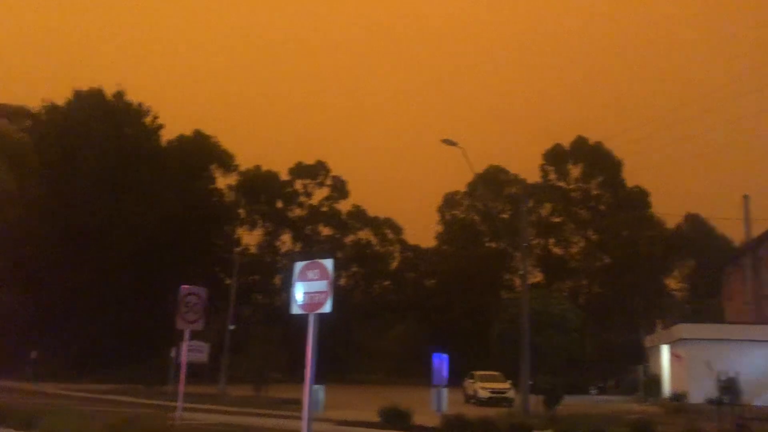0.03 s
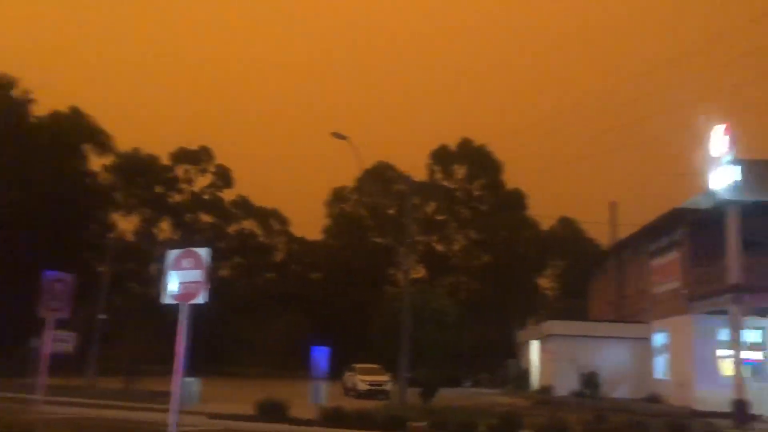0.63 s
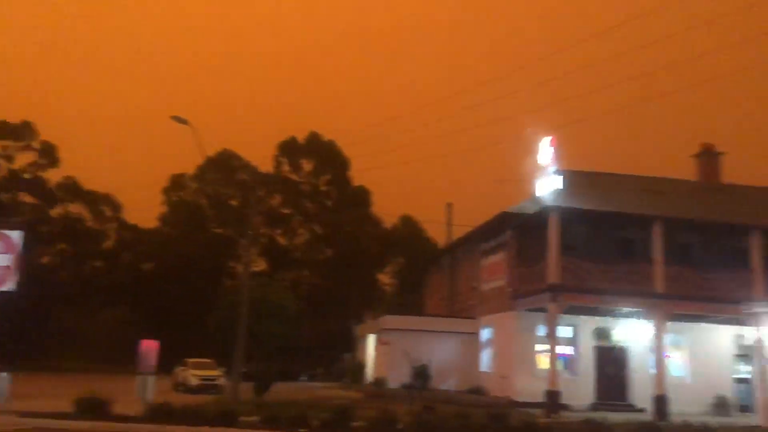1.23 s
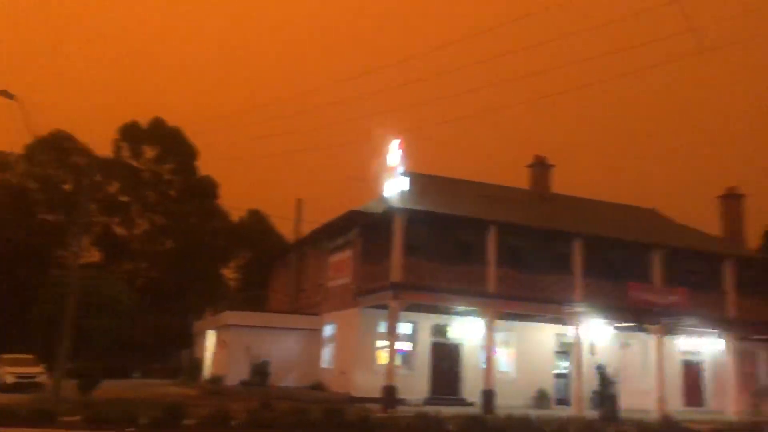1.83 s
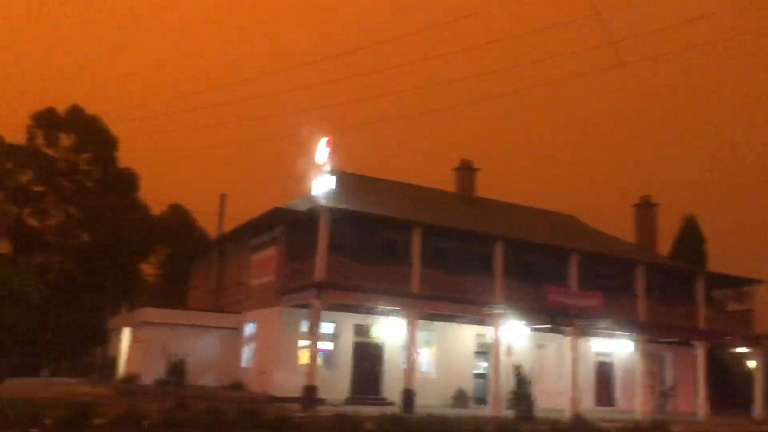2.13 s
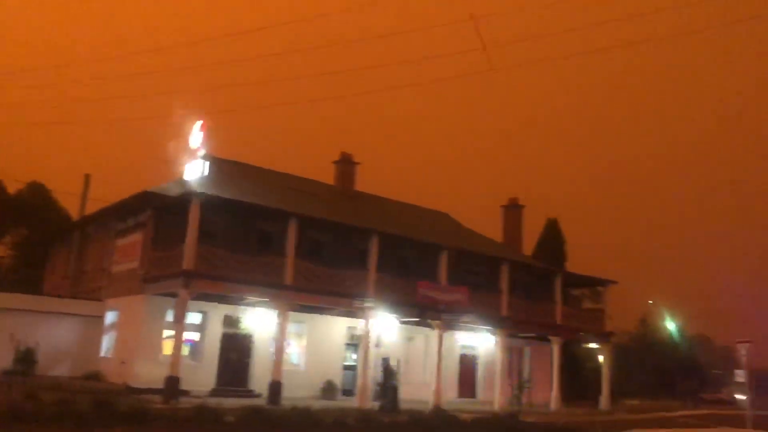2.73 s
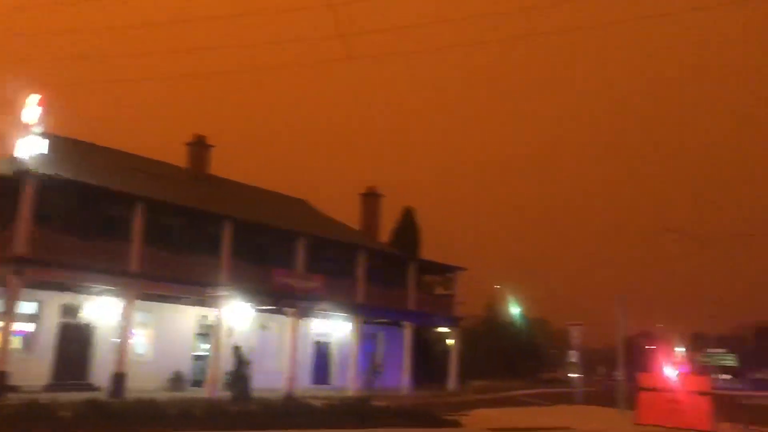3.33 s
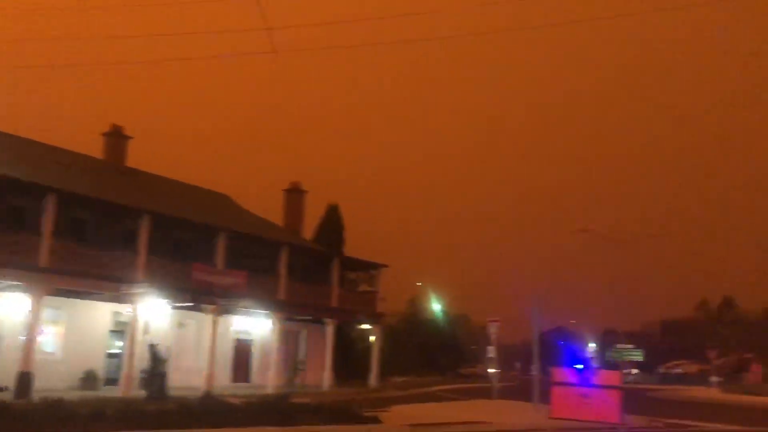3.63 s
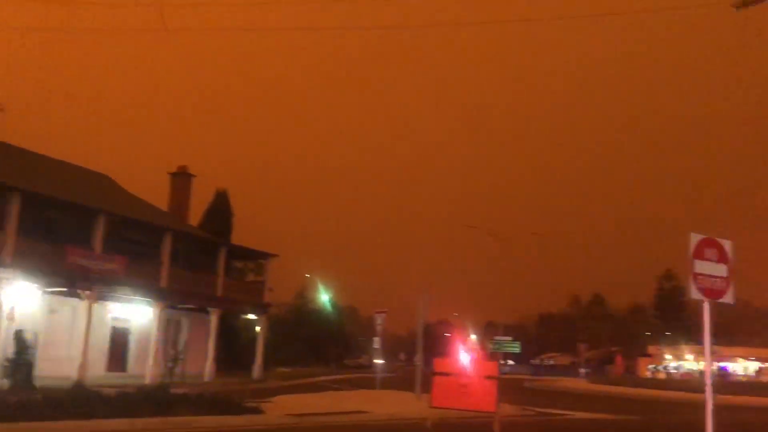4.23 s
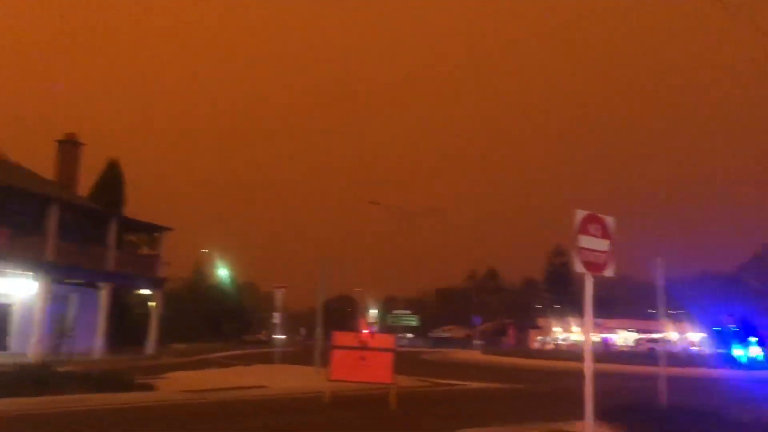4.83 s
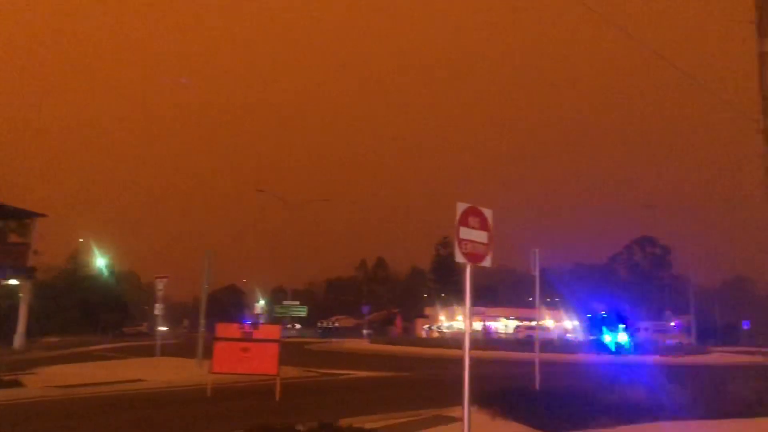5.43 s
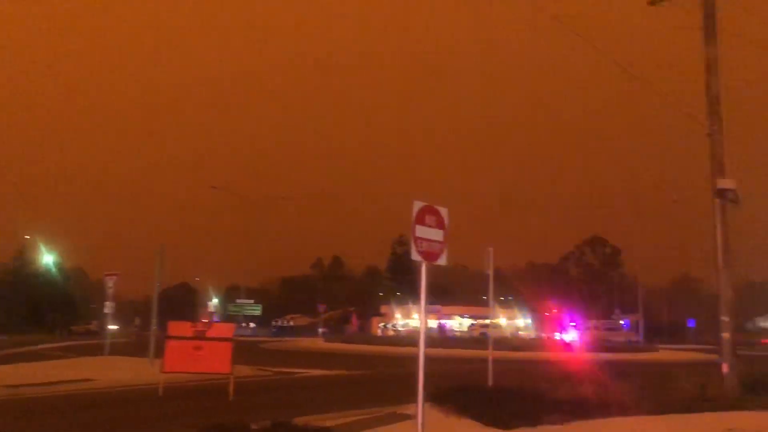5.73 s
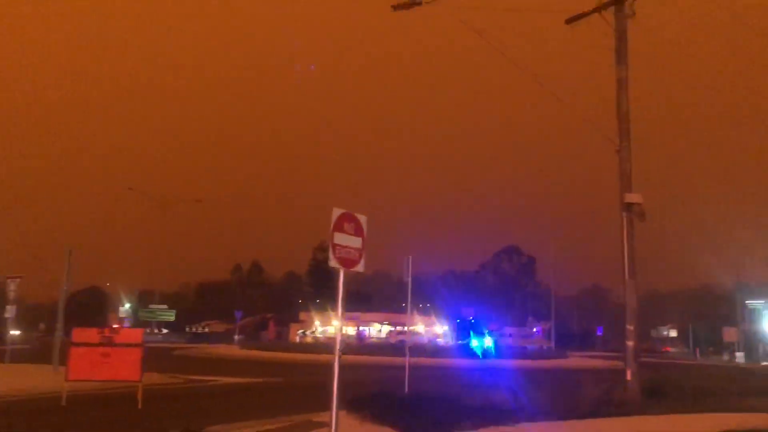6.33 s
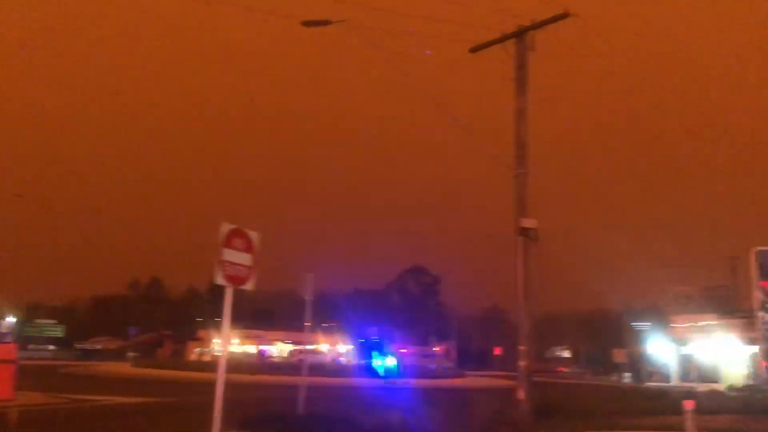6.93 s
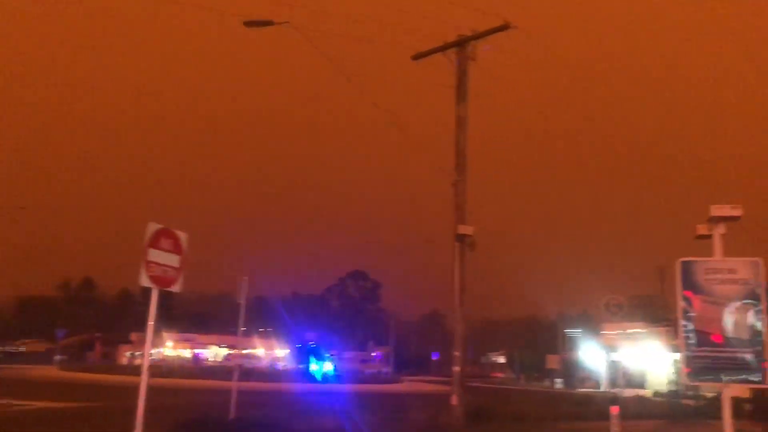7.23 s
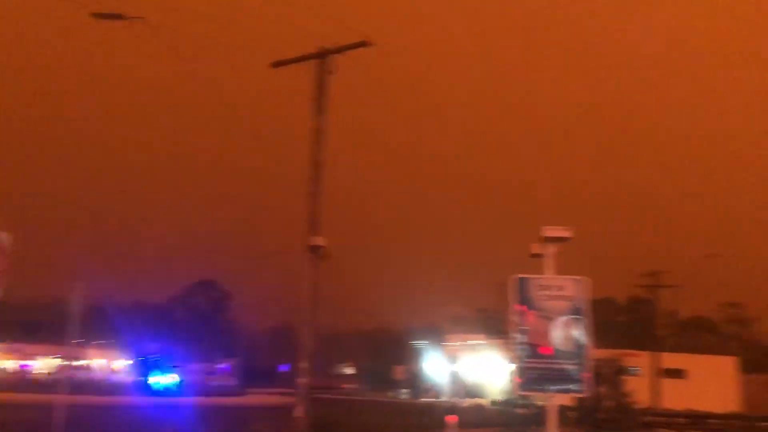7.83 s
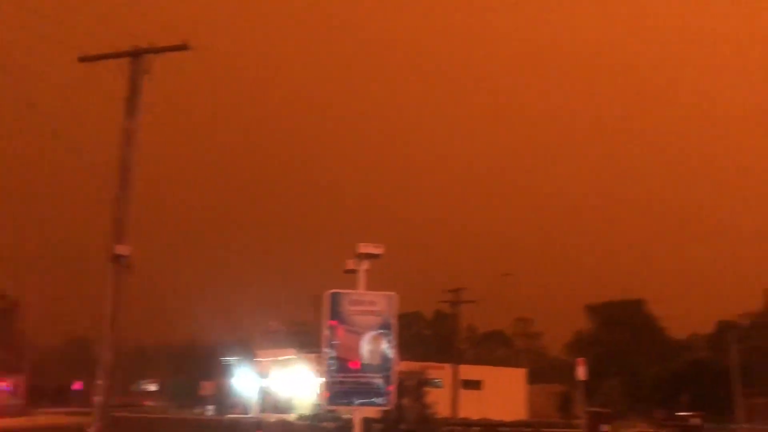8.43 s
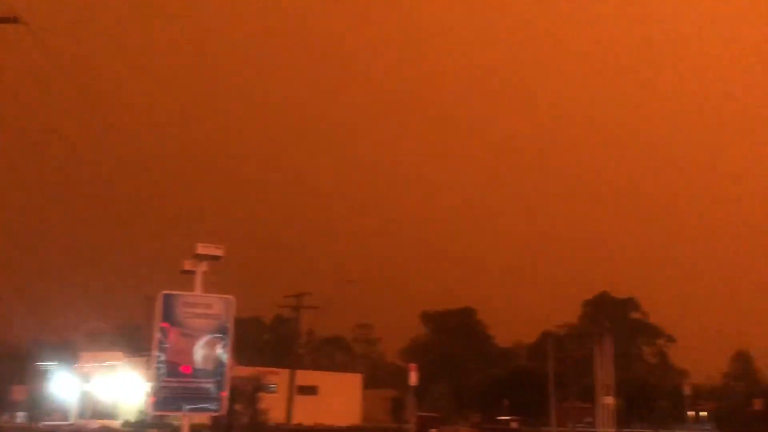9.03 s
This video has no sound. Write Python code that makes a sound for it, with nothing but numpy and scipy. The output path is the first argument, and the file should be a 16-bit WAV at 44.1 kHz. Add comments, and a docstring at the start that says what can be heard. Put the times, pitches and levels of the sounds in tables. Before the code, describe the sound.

A steady rumble of idling vehicles and far traffic outdoors, with gusts of wind and scattered handling clicks and bumps.

```python
"""Idling engines at a night junction

Two engines idle some way off, heard on a hand-held phone that slowly pans. Exhaust pulses drone and
injectors tick over a wash of fans and far traffic; tyre hiss grows at the end. Gusts buffet the
microphone, fingers rub, click and bump on the case, and the lens ticks as it focuses."""
import sys
import numpy as np
from scipy import signal
from scipy.fft import rfft, irfft
from scipy.io import wavfile
from scipy.ndimage import uniform_filter1d

SR = 44100
rng = np.random.default_rng(int(sys.argv[2]) if len(sys.argv) > 2 else 0)


def log_audio(samples):
    """Write samples as a 16-bit WAV file to the path given in sys.argv[1]."""
    # one column per channel
    frames = np.atleast_2d(samples).T
    # limit to full scale, then quantise
    limited = np.clip(frames, -1, 1)
    pcm = np.round(limited * 32767).astype(np.int16)
    wavfile.write(sys.argv[1], SR, pcm)


N = 399987
T = np.arange(N) / SR
FREQ_HZ = np.maximum(np.fft.rfftfreq(N, 1 / SR), 1)


# near exhaust harmonics: firing_multiple, level_db
NEAR_EXHAUST = [(1, -48.5), (2, -38), (3, -50), (4, -47.5), (5, -50.5), (6, -58), (7, -57.5), (8, -61),
                (11, -66.5), (18, -64)]
# near exhaust as the phone turns: time_s, gain_db
PAN_GAIN = [(0, -1.5), (4.1, 1), (4.7, -2), (6.5, -0.5), (7.3, 1), (9.07, .5)]
# far exhaust harmonics: firing_multiple, level_db
FAR_HARMONICS = [(3, -50.5), (4, -52), (6, -62.5), (8, -49), (12, -62)]

def engines(near_firing_hz=39.83, far_firing_hz=22.22):
    """Two governed idles, each hunting slightly about its speed."""
    near_cycles = np.cumsum(near_firing_hz * (1 + 0.00244 * walk(3))) / SR
    far_cycles = np.cumsum(far_firing_hz * (1 + 0.0041 * walk(2))) / SR
    drone = undb(curve(PAN_GAIN)) * exhaust(near_cycles, NEAR_EXHAUST, waver_db=1.0)
    return drone + injectors(near_cycles) + exhaust(far_cycles, FAR_HARMONICS, waver_db=2.5)


def exhaust(cycles, harmonics, waver_db):
    """Harmonics of the firing pulses; moving air makes each swell and fade."""
    drone = np.zeros(N)
    for multiple, level_db in harmonics:
        amplitude = np.sqrt(2) * undb(level_db + waver_db * walk(4))
        drone += amplitude * np.sin(2 * np.pi * (multiple * cycles + rng.random()))
    return drone


# injector rasp: freq_hz, relative_db
INJECTOR_SPECTRUM = [(1500, 16.5), (2500, 5.0), (4500, 4), (6500, -6.5), (9000, -21.5)]

def injectors(cycles, level_db=-63, decay_cycles=0.54, weak_gain=0.71):
    """A short rasp at each firing, strong and weak in turn."""
    envelope = np.exp(-(cycles % 1) / decay_cycles) * np.where(cycles % 2 < 1, 1, weak_gain)
    return undb(level_db) * colour(envelope * noise(), INJECTOR_SPECTRUM)


# breeze between gusts: time_s, level_db
BREEZE_LEVEL = [(0, -46.5), (2.4, -29.5), (3.6, -42), (4.8, -41.5), (6, -33), (7, -42), (9.07, -44.5)]
# gusts: centre_s, half_length_s, level_db
WIND_GUSTS = [(1.393, .1, -31.5), (1.805, 0.11, -26), (1.947, 0.03, -17.5), (2.1, 0.12, -28),
              (2.71, 0.076, -20.5), (2.864, 0.14, -23.5), (3.373, 0.067, -34), (4.048, 0.3, -35),
              (5.15, .04, -27.5), (5.42, 0.1, -32), (5.857, 0.054, -28), (6.365, 0.14, -31),
              (8.018, 0.058, -31.5), (8.346, 0.02, -30)]
# buffeting: freq_hz, relative_db
BUFFET_SPECTRUM = [(20, -34.5), (30, -24.5), (40, -5), (60, 5.5), (115, 1.5), (190, -8.5), (300, -30.5),
                   (500, -36), (1200, -62)]
# fronts of the two big gusts: centre_s, half_length_s, level_db
GUST_FRONTS = [(1.746, .09, -40.5), (2.617, 0.12, -42.5)]
# their flutter: freq_hz, relative_db
FLUTTER_SPECTRUM = [(150, 0.5), (280, -1), (430, -6), (700, -25)]

def wind(eddy_db=1.0):
    """Gusts break on the microphone port; the front of a big one brings smaller, brighter eddies."""
    power = undb(curve(BREEZE_LEVEL)) ** 2
    power += sum((undb(db) * bell(centre_s, half_s)) ** 2 for centre_s, half_s, db in WIND_GUSTS)
    eddies = noise() * undb(eddy_db * walk(30))
    buffets = colour(eddies, BUFFET_SPECTRUM) * np.sqrt(power)
    fronts = sum(undb(db) / (1 + ((T - centre_s) / half_s) ** 4) for centre_s, half_s, db in GUST_FRONTS)
    return buffets + fronts * colour(noise(), FLUTTER_SPECTRUM)


# contacts with the case: start_s, force_db, hardness_hz
CONTACTS = [(0.323, -34, 4000), (0.4247, -22.5, 4300), (0.424, -12.5, 250), (0.6999, -21.5, 3450),
            (0.6994, -12.5, 252), (1.2136, -28.5, 14000), (1.251, -16, 1800), (1.658, -42, 15000),
            (1.7128, -44, 9000), (2.0341, -48, 15000), (2.4838, -32.5, 8000), (3.0669, -36, 6000),
            (4.736, -45, 5500), (6.1857, -40, 5500), (6.245, -50, 16000), (6.3811, -32, 5500),
            (6.4488, -40, 5800), (6.738, -29.5, 5840), (7.4576, -33, 5000), (7.5323, -32.5, 8500)]
# case modes: pitch_hz, gain_db, t60_s
CASE_MODES = [(76.4, -1.5, 0.092), (154.5, 5, 0.027), (1280, 0, 0.0085), (1710, -0.5, 0.0084),
              (4320, -9, 0.011), (4990, -3, 0.0062), (5320, 1, 0.0036), (6200, -3, 0.0064),
              (7730, -1, 0.0034), (11400, -4.5, 0.0028), (14000, -3, 0.0025)]

def clicks(detune=0.025, span_octaves=3.7, steepness=3.4):
    """Each contact rings the case: a soft one thumps the low modes, a hard one reaches the high ones."""
    sound = np.zeros(N + SR)
    t = T[:SR // 4]
    for start_s, force_db, hardness_hz in CONTACTS + grip():
        start = int(start_s * SR)
        lowest_hz = hardness_hz / 2 ** span_octaves
        for hz, gain_db, t60_s in CASE_MODES:
            drive = undb(force_db) / (1 + (hz / hardness_hz) ** steepness)
            drive /= np.hypot(1, (lowest_hz / hz) ** 2)
            detuned_hz = hz * (1 + detune * rng.standard_normal())
            ring = np.sin(2 * np.pi * detuned_hz * t) * np.exp(-np.log(1000) * t / t60_s)
            onset = 1 - np.exp(-(hz * t) ** 2)  # builds over about a cycle
            sound[start:start + len(t)] += undb(gain_db) * drive * ring * onset
    return sound[:N]


def grip(count=12, start_s=6.9, end_s=7.9, force_db=-48, scatter_db=3, hardness_hz=6500):
    """Rows of faint contacts at random moments as the fingers shift."""
    return [(rng.uniform(start_s, end_s), force_db + rng.uniform(-scatter_db, scatter_db), hardness_hz)
            for _ in range(count)]


# taps on the phone: centre_s, pitch_hz, half_length_s, peak_db
SOFT_TAPS = [(.425, 1660, 0.00051, -20.5), (1.869, 1570, 0.0011, -23.5), (3.259, 2110, 0.00031, -29.5),
             (3.365, 1250, .001, -32), (7.676, 1550, 0.0016, -29), (7.711, 1150, 0.00043, -24),
             (7.74, 1200, 0.00042, -21)]

def taps():
    """A soft contact leaves a rounded packet of a few cycles."""
    return sum(undb(db) * bell(centre_s, half_s) * np.cos(2 * np.pi * hz * (T - centre_s))
               for centre_s, hz, half_s, db in SOFT_TAPS)


# finger strokes: start_s, length_s, level_db
RUB_STROKES = [(0.024, 0.19, -57.5), (0.112, 0.058, -51.5), (0.318, 0.19, -60), (2.9, 0.29, -61),
               (4.1, 0.078, -59.5), (6.3, 0.38, -68)]
# skin friction: freq_hz, relative_db
RUB_SPECTRUM = [(1000, -1.5), (2200, 12), (3000, -11), (4000, 1.5), (4450, 3), (5000, -8), (6500, -8.5),
                (8500, -22), (12000, -35), (15000, -26)]

def rubs(catch_db=2.5):
    """Skin catches and slips on the case in short strokes."""
    envelope = np.zeros(N)
    for start_s, length_s, level_db in RUB_STROKES:
        progress = np.clip((T - start_s) / length_s, 0, 1)
        envelope += undb(level_db) * np.sqrt(np.sin(np.pi * progress))
    friction = noise() * undb(catch_db * walk(180))
    return envelope * colour(friction, RUB_SPECTRUM)


# fans and far traffic: freq_hz, relative_db
WASH_SPECTRUM = [(25, -22), (45, 1.5), (80, 8), (160, 2), (260, 1), (380, -6), (850, -7.5), (1200, -7),
                 (1400, -11.5), (1830, -9.5), (2300, -20), (3100, -29), (4900, -33), (5700, -43),
                 (7000, -46), (9000, -51.5), (15500, -52.5)]

def wash(level_db=-40.5, drift_db=0.5, flicker_db=0.5, swell_db=0.07, flutter_db=0.47):
    """Fans and far traffic; each octave drifts and flickers, and the whole swells and flutters a little."""
    spectrum = rfft(colour(noise(), WASH_SPECTRUM))
    air = np.zeros(N)
    for octave in range(4, 15):
        weight = np.maximum(1 - abs(np.log2(FREQ_HZ) - octave), 0)
        air += irfft(spectrum * weight, N) * undb(drift_db * walk(2.34) + flicker_db * walk(16))
    return air * undb(level_db + swell_db * walk(2.6) + flutter_db * walk(25))


# fan and belt tones: pitch_hz, width_hz, level_db
WHINE_BANDS = [(411.6, 5.4, -61), (710, 51, -65), (1020, 170, -59.5), (1600, 410, -55), (5030, 140, -76.5),
               (10040, 120, -95)]

def whines():
    """Narrow unsteady tones of fans and belts."""
    return sum(undb(db) * band(hz, width_hz) for hz, width_hz, db in WHINE_BANDS)


# tyre hiss: freq_hz, relative_db
TYRE_SPECTRUM = [(1200, -4), (2300, 6.5), (3900, 8.5), (5000, 4.5), (6500, -6), (8000, -24), (10000, -44)]
# car's approach: time_s, level_db
APPROACH_LEVEL = [(0, -86), (6.5, -73.5), (7.9, -63.5), (8.55, -62), (8.9, -56), (9.07, -59)]

def tyres():
    """Smooth hiss of a car coming nearer."""
    return colour(noise(), TYRE_SPECTRUM) * undb(curve(APPROACH_LEVEL))


# squeaks: centre_s, pitch_hz, width_hz, half_length_s, level_db
FAR_SQUEAKS = [(4.242, 1640, 110, .06, -50), (4.53, 1650, 80, .03, -52), (6.156, 5250, 200, 0.022, -68),
               (6.766, 1000, 260, 0.12, -47), (6.894, 4730, 150, 0.017, -62),
               (8.166, 5260, 200, 0.017, -60)]

def squeaks():
    """Short rough tones from across the road."""
    return sum(undb(db) * bell(centre_s, half_s) * band(hz, width_hz)
               for centre_s, hz, width_hz, half_s, db in FAR_SQUEAKS)


# focus hunts: start_s, length_s, level_db
FOCUS_HUNTS = [(.325, .14, -75), (2.225, .32, -76), (2.925, .16, -74), (3.19, .08, -74), (4.258, .37, -73),
               (4.735, .23, -76.5), (6.49, .17, -76)]
# ring of the motor steps: freq_hz, relative_db
LENS_SPECTRUM = [(3000, -18), (4500, -5), (6400, 0), (7500, -16), (12000, -26), (14500, -13), (15800, -15)]

def lens(frame_hz=30, lag_frames=0.4, decay_s=0.0008, second_step_db=-1.5):
    """The focus motor steps twice a frame, a tiny dry tick each time."""
    envelope = np.zeros(N)
    for start_s, length_s, level_db in FOCUS_HUNTS:
        frames = (T - start_s) * frame_hz
        first, second = (np.exp(-((frames - lag) % 1) / frame_hz / decay_s) for lag in (0, lag_frames))
        steps = unit(first + undb(second_step_db) * second)
        envelope += undb(level_db) * steps * gate(start_s, start_s + length_s)
    return envelope * colour(noise(), LENS_SPECTRUM)


# circuit whistles: start_s, end_s, pitch_hz, level_db
CIRCUIT_TONES = [(0, 3.1, 7500, -88), (6.25, 9.1, 7500, -91), (2.55, 6.25, 13500, -95),
                 (2.55, 9.1, 15000, -98)]

def circuits():
    """Faint pure tones switch on and off inside the phone."""
    return sum(np.sqrt(2) * undb(db) * np.sin(2 * np.pi * hz * T) * gate(start_s, end_s)
               for start_s, end_s, hz, db in CIRCUIT_TONES)


def undb(db):
    """Decibels to gain."""
    return 10 ** (np.asarray(db) / 20)


def unit(x):
    """Scale to standard deviation 1."""
    return x / np.std(x)


def curve(rows):
    """Straight lines through (time_s, value) rows."""
    return np.interp(T, *np.transpose(rows))


def bell(centre_s, half_s):
    """Gaussian swell, peak 1."""
    return np.exp(-np.minimum(((T - centre_s) / half_s) ** 2, 20))


def gate(start_s, end_s):
    """On between two times."""
    return (T > start_s) & (T < end_s)


def noise():
    """White noise."""
    return rng.standard_normal(N)


def walk(rate_hz):
    """Random levels at rate_hz, smoothed twice; spread 1."""
    hold = int(SR / rate_hz)
    levels = np.repeat(rng.standard_normal(N // hold + 2), hold)
    return unit(uniform_filter1d(uniform_filter1d(levels, hold), hold)[:N])


def band(hz, width_hz):
    """Noise in one resonance; rms 1."""
    return unit(irfft(rfft(noise()) / (1 + (2 * (FREQ_HZ - hz) / width_hz) ** 2), N))


def colour(x, points):
    """Filter by (freq_hz, relative_db) points, rolling off an octave past each end; rms 1."""
    hz, db = np.transpose(points)
    gain = undb(np.interp(np.log(FREQ_HZ), np.log(hz), db))
    rolloff = 1 / (1 + (hz[0] / FREQ_HZ / 2) ** 4) / (1 + (FREQ_HZ / hz[-1] / 2) ** 4)
    return unit(irfft(rfft(x) * gain * rolloff, N))


def scene():
    """Street, wind and handling on one microphone."""
    street = engines() + whines() + wash() + tyres() + squeaks()
    phone = wind() + rubs() + lens() + clicks() + taps() + circuits()
    return (street + phone)[None]


def record(dry):
    """The phone opens its microphone after a moment and cuts the top."""
    open_s, cutoff_hz = 0.035, 15900
    lowpass = signal.ellip(8, 0.2, 70, cutoff_hz, fs=SR, output="sos")
    return signal.sosfilt(lowpass, dry * (T > open_s))


dry = scene()
out = record(dry)
log_audio(out)
```